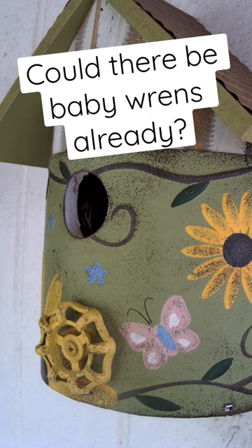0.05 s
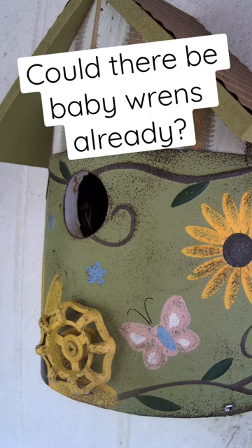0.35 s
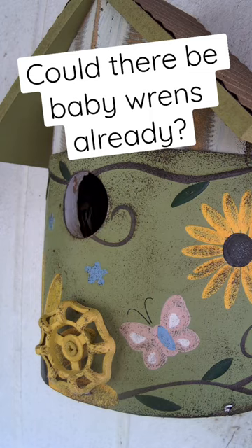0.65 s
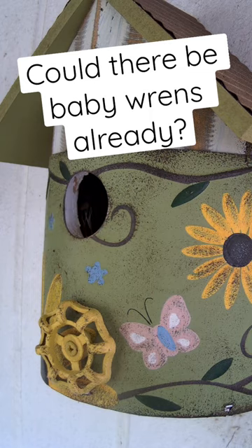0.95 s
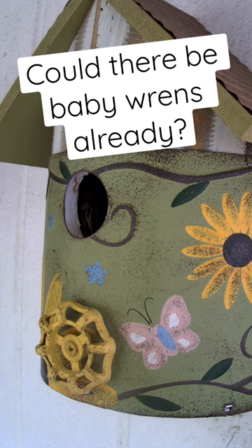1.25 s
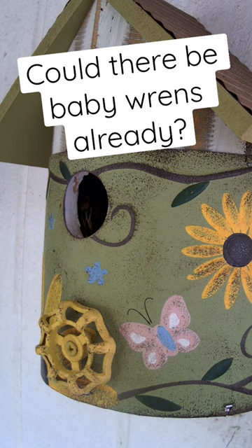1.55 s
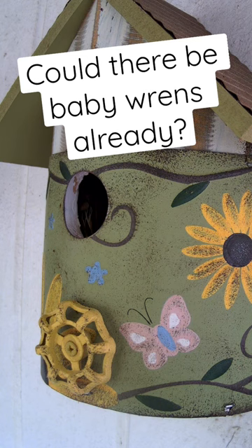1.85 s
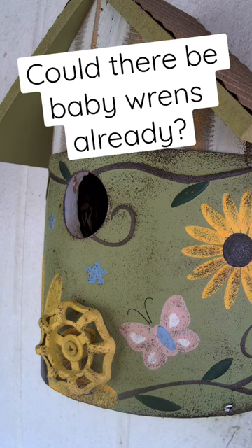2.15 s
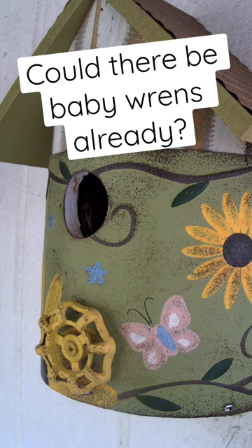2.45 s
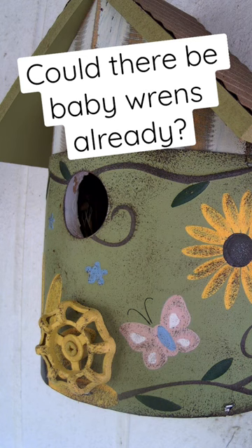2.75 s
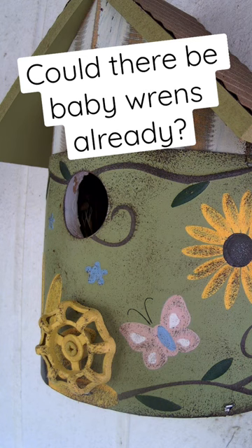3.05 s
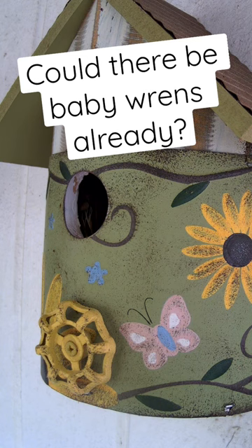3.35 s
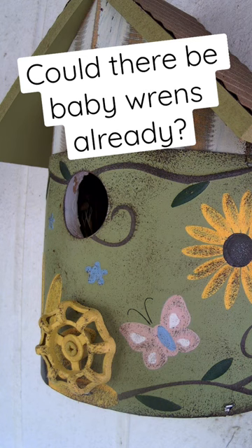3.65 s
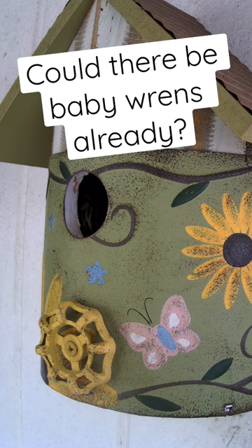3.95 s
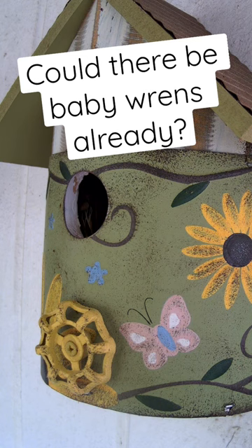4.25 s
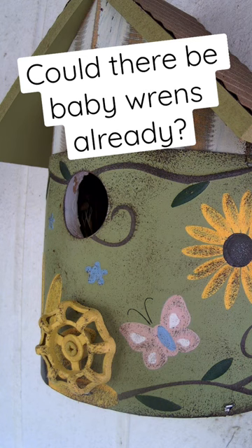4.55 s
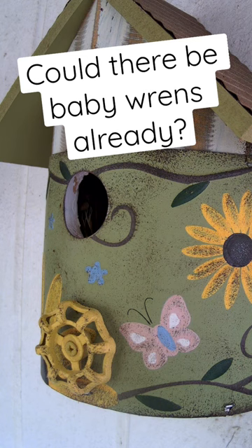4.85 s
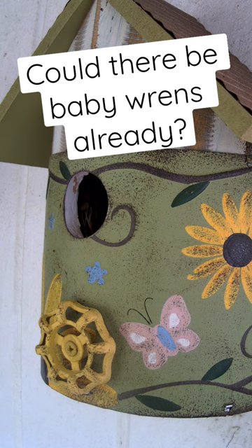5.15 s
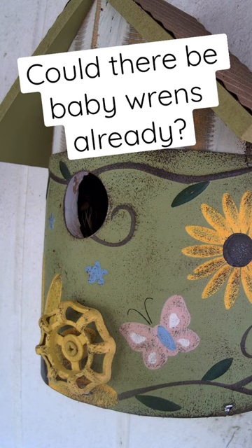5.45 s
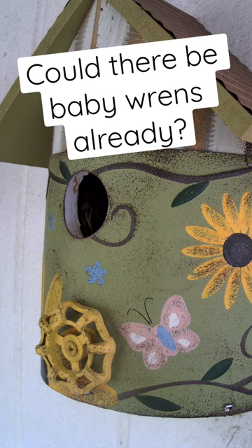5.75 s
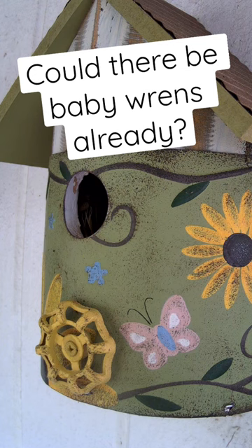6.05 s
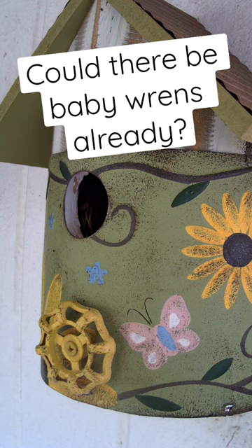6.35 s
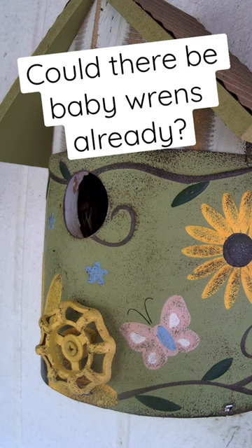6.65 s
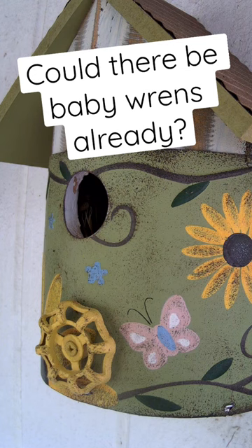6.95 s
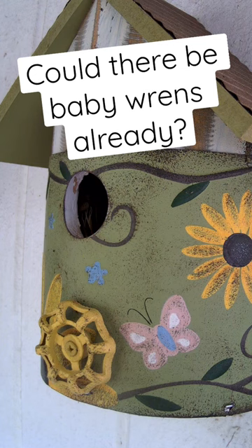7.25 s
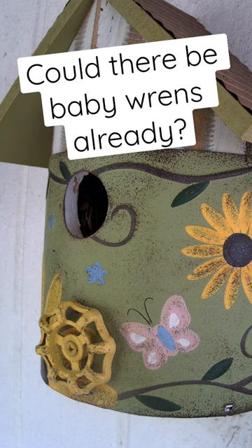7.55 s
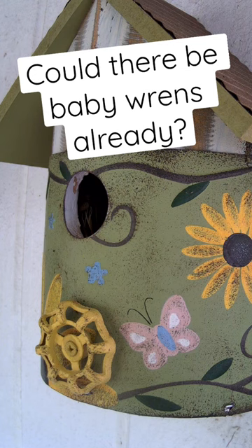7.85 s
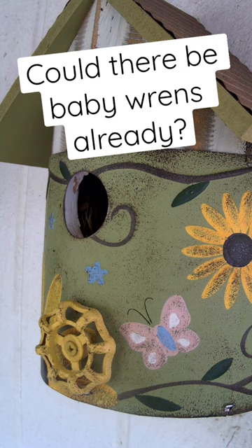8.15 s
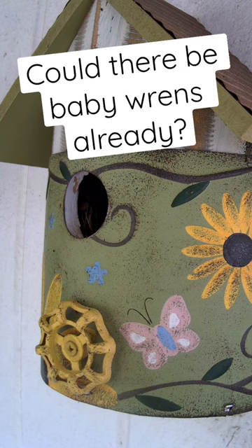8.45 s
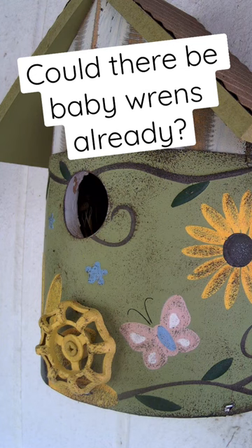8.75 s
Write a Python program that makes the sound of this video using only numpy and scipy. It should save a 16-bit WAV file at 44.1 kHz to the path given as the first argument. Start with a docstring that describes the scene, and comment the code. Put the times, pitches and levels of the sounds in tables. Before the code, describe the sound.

Baby birds squeak hoarsely as songbirds whistle far off and traffic hums; after a thump, a nearby bird sings loudly.

```python
"""From the start, distant traffic hums and wren chicks beg in rasping upslurs inside a wooden birdhouse,
while songbirds whistle across the backyard. After three and a half seconds the chicks scratch about
and fall quiet. Near four seconds a hand rubs the phone and bumps it once. The far birds sing on,
and at eight seconds one starts a loud rolling song close by, echoed by the house wall and the yard.
Under it, near the end, the chicks give two thin begging squeaks."""
import sys
import numpy as np
from scipy import signal
from scipy.fft import rfft, irfft
from scipy.io import wavfile

SR = 44100
rng = np.random.default_rng(int(sys.argv[2]) if len(sys.argv) > 2 else 0)


def int16_out(signal):
    """Quantize to a 16-bit WAV file."""
    q = np.round(np.clip(np.atleast_2d(signal).T, -1, 1) * 32767)
    wavfile.write(sys.argv[1], SR, q.astype(np.int16))


N = 392931
TIME = np.arange(N) / SR


def undb(db):
    """Turn decibels into a number to multiply by."""
    return 10 ** (np.asarray(db) / 20)


def unit(x):
    """Scale a sound to an average strength (rms) of 1."""
    return x / np.sqrt(np.mean(x ** 2) + 1e-18)


def add(out, start, x):
    """Mix x into out, beginning at start seconds."""
    i = max(int(start * SR), 0)
    out[i:i + len(x)] += x[:max(N - i, 0)]


def band(x, hz, width_hz):
    """One resonance: pitches near hz pass, the others are weakened."""
    g, k = np.tan(np.pi * hz / SR), width_hz / hz
    return signal.lfilter([g * k, 0, -g * k], [1 + g * k + g * g, 2 * (g * g - 1), 1 - g * k + g * g], x)


def ring(x, modes):
    """An object rings at several resonances, each given as (f/Hz, width/Hz, level/dB)."""
    return sum(undb(db) * band(x, hz, width) for hz, width, db in modes)


def wander(t, rate):
    """A random drift, roughly 1 up or down, that turns rate times a second."""
    points = np.random.default_rng(rng.integers(2 ** 31)).standard_normal(int(t[-1] * rate) + 2)
    return np.interp(t * rate, np.arange(len(points)), points)


def edges(t, fade_s=0.0047):
    """A soft start and end for a note."""
    return np.sin(np.pi / 2 * np.clip(np.minimum(t, t[-1] - t) / fade_s, 0, 1)) ** 2


def reverb(x, decay_s, gap_s=0.00043):
    """Countless small echoes blur together and fade by 60 dB in decay_s."""
    t = np.arange(SR // 2) / SR
    echoes = rng.standard_normal(len(t)) * np.exp(-np.log(1000) * t / decay_s) * (t > gap_s)
    return signal.fftconvolve(x, echoes / np.linalg.norm(echoes))[:N]


# the outdoor hum, from bass to treble: f/Hz, relative level/dB
HUM_SHAPE = [(25, -4.5), (40, 4.5), (66, 0), (102, -3), (180, -3.5), (215, -8), (270, -11), (335, -14),
             (550, -18.5), (760, -22), (1380, -31.5), (1550, -39.5), (2850, -38), (3600, -48.5),
             (7000, -51)]
# how the far traffic swells and sinks: t/s, relative engine level/dB, relative tyre level/dB
TRAFFIC_SWELLS = [(0.0, -2.5, -6), (0.801, -2.5, -2.5), (1.45, -4.5, -1.5), (1.9, 2.5, 3.5), (2.5, -2, 1),
                  (3.3, 4.5, -2), (4.299, 1, 5.5), (4.9, 0.5, 5), (5.9, 1.5, 5.5), (6.7, 2.0, -3),
                  (7.399, -1.5, -4), (8.9, -2.5, -4)]
# low notes of the engines: f/Hz, relative level/dB
ENGINE_TONES = [(48, -16.5), (76, -9), (146, -8.5), (178, -17.5), (257, -16.5), (437, -24), (515, -35)]


def distant_traffic(level_db=-40.5, waver_db=2.5):
    """A wavering rumble and smooth hiss, with engines and tyres that swell far away."""
    hum_hz, hum_db = np.transpose(HUM_SHAPE)
    f = np.maximum(np.fft.rfftfreq(N, 1 / SR), 1)
    shape = undb(np.interp(np.log(f), np.log(hum_hz), hum_db)) / (1 + (20 / f) ** 4)
    hum = unit(irfft(rfft(rng.standard_normal(N)) * shape, N))
    times, engine_swell, tyre_swell = np.transpose(TRAFFIC_SWELLS)
    rumble_db = waver_db * wander(TIME, 11)
    engine_db = np.interp(TIME, times, engine_swell - engine_swell.mean()) - 0.94
    tyre_db = np.interp(TIME, times, tyre_swell - tyre_swell.mean()) - 1.73
    tyre_db += waver_db / 2 * wander(TIME, 5)
    out = hum.copy()
    for swell_db, hz, width in [(rumble_db, 55, 60), (engine_db, 170, 110), (tyre_db, 400, 380)]:
        out += (undb(swell_db) - 1) * band(hum, hz, width)
    for hz, db in ENGINE_TONES:
        tone = unit(band(band(rng.standard_normal(N), hz, 14.7), hz, 14.7))
        out += tone * undb(db + engine_db + 4 * wander(TIME, 3))
    return undb(level_db) * out


def whistle(t, hz, wobble, flutter_db=6.0):
    """A nearly pure note that trembles in loudness and, by the share wobble, in pitch."""
    pitch = hz * (1 + wobble * wander(t, 150))
    return undb(flutter_db * wander(t, 200)) * np.sin(2 * np.pi * np.cumsum(pitch) / SR)


def slur(length, start_hz, middle_hz, end_hz, wobble):
    """A whistle slides through three pitches and swells until two thirds of the way through."""
    t = np.arange(0, length, 1 / SR)
    curve = np.polyfit([0, 0.5, 1], np.log([start_hz, middle_hz, end_hz]), 2)
    hz = np.exp(np.polyval(curve, t / length))
    swell = np.sin(np.pi / 2 * np.interp(t / length, [0, 0.67, 1], [0, 1, 0]))
    return swell * whistle(t, hz, wobble)


def song(phrase, times, wobble):
    """A bird sings its phrase of sliding notes at each of the given times."""
    out = np.zeros(N)
    for start, db in times:
        for after, length, start_hz, middle_hz, end_hz, note_db in phrase:
            note = slur(length, start_hz, middle_hz, end_hz, wobble)
            add(out, start + after, undb(db + note_db) * note)
    return out


# notes of three far songs: t/s into the phrase, length/s, start f/Hz, middle f/Hz, end f/Hz, level/dB
LILTING_NOTES = [(-.008, 0.046, 2070, 2390, 2690, 2), (.085, 0.035, 4700, 3280, 2850, -12),
                 (.112, 0.0376, 2440, 2750, 2980, 0), (.152, 0.059, 3560, 3400, 2960, -0.5)]
TWITTER_NOTES = [(0.00077, 0.039, 5600, 4420, 4400, -3.5)]
SLURRED_NOTES = [(0, 0.04, 2677, 2259, 2360, -4), (.042, .038, 2534, 2765, 2820, -4.5),
                 (.138, .056, 4850, 3980, 3380, -7.5), (.19, .068, 3057, 2885, 2725, -0.5)]
# when each of them is sung: t/s, level/dB
LILTING_TIMES = [(0.143, -53), (0.468, -45.5), (0.783, -46), (1.107, -46.5), (5.099, -46), (5.413, -46.5),
                 (5.726, -47.5), (6.039, -43.5)]
TWITTER_TIMES = [(5.446, -61), (5.54, -60), (5.63, -63), (5.73, -69), (5.83, -66)]
SLURRED_TIMES = [(0.666, -48), (1.114, -46), (1.559, -48.5), (6.881, -63.5), (7.322, -45), (7.762, -43)]
# single far whistles, and the bright opening of the near bird's first phrase:
# t/s, length/s, start f/Hz, middle f/Hz, end f/Hz, level/dB
SINGLE_NOTES = [(1.222, 0.033, 6900, 5630, 4900, -65), (2.375, 0.028, 3050, 2640, 2540, -50),
                (2.425, .11, 2600, 2626, 3150, -40), (2.632, .035, 3150, 2850, 2600, -46),
                (2.65, .17, 2680, 2457, 2080, -48.5), (3.03, 0.066, 2880, 3080, 3180, -51.5),
                (3.243, 0.11, 2880, 2657, 2370, -47), (3.35, .09, 2280, 2150, 2080, -59),
                (4.87, 0.14, 2650, 2583, 2570, -56), (4.938, 0.048, 3520, 3490, 2970, -53),
                (5.915, .06, 2120, 2150, 2150, -54), (6.028, 0.038, 3260, 2794, 2300, -45),
                (6.43, 0.042, 3370, 2790, 2400, -53), (6.955, 0.12, 4220, 4460, 4350, -65.5),
                (7.51, 0.08, 5800, 5910, 5860, -58.5), (7.64, 0.25, 5960, 5860, 5870, -62.5),
                (7.983, 0.017, 4320, 4400, 4210, -32.5), (8.325, 0.18, 4920, 4820, 4800, -59)]


def yard_whistles():
    """Far songs and the near bird's opening note echo in the yard; trees scatter the farthest songs."""
    farthest = song(LILTING_NOTES, LILTING_TIMES, wobble=0.026)
    farthest += song(TWITTER_NOTES, TWITTER_TIMES, wobble=0.018)
    birds = undb(-2.5) * farthest + undb(-4.5) * reverb(farthest, 0.19, gap_s=0.0037)
    birds += song(SLURRED_NOTES, SLURRED_TIMES, wobble=0.0043)
    birds += song(SINGLE_NOTES, [(0.0032, 0)], wobble=0.0054)
    return birds + undb(-10) * reverb(birds, 0.091) + undb(-9) * reverb(birds, 0.69)


# the quick pushes that make up the bump: t/s, contact time/s, level/dB
PUSHES = [(3.868, 0.0083, -16.5), (3.909, 0.0066, -15.5), (3.938, 0.0055, -18), (3.979, 0.041, -20.5),
          (4.0193, 0.00301, 1.5), (4.022, 0.00052, -12.5), (4.0389, 0.007, -4.5), (4.052, 0.0043, -8.5),
          (4.072, 0.0042, -17), (4.121, 0.0067, -14.5)]
# pitches at which the phone and hand ring: f/Hz, width/Hz, level/dB
PHONE_RESONANCES = [(58, 29, 2), (144, 40, 2.5), (236, 130, -2.5), (600, 570, 0), (1450, 1200, -13)]


def phone_bump(rub_db=-23, shake_db=-20, relax_s=0.017):
    """Pushes thump the phone, brighter when short; the hand rubs and shakes while it pushes."""
    force = np.zeros(N)
    for start, contact, db in PUSHES:
        add(force, start, undb(db) * np.sin(np.pi * np.arange(0, contact, 1 / SR) / contact))
    grip = signal.lfilter([1], [1, -np.exp(-1 / (relax_s * SR))], force)
    rub_filter = signal.butter(4, [140, 520], "band", fs=SR, output="sos")
    rub = undb(rub_db) * unit(signal.sosfilt(rub_filter, rng.standard_normal(N)))
    shake = undb(shake_db) * unit(band(band(rng.standard_normal(N), 88, 97), 90, 90))
    return ring(force, PHONE_RESONANCES) + (rub + shake) * grip / grip.max()


def scrape(length, grain_db=5):
    """A short, grainy noise that dies away."""
    t = np.arange(0, length, 1 / SR)
    grains = rng.standard_normal(len(t)) * undb(grain_db * wander(t, 610))
    return grains * edges(t, fade_s=0.00079) * np.exp(-t / length)


# scratches in the nest, and a hand rubbing the phone just before the bump:
# t/s, length/s, f/Hz, level/dB, relative treble level/dB
RUSTLES = [(3.606, 0.034, 1430, -42.5, 2), (3.833, 0.1, 1360, -49.5, -17), (3.902, 0.0069, 1090, -39, -14),
           (3.939, 0.032, 1380, -53.5, -13), (3.975, .01, 1600, -49, -23), (4.574, 0.041, 1680, -46, -17.5),
           (4.588, 0.015, 2400, -52, -22), (4.766, 0.016, 2430, -50, -18), (4.784, 0.011, 2330, -52.5, -24),
           (4.877, 0.021, 2620, -53.5, -21), (7.002, 0.0087, 2400, -57.5, -5),
           (7.185, 0.015, 2300, -59, -15), (7.212, 0.016, 2580, -48, -11), (7.233, 0.045, 2540, -57.5, -13),
           (7.263, 0.022, 2540, -54.5, -5)]
# thin high squeaks, among them two begging calls near the end: t/s, length/s, f/Hz, level/dB
THIN_SQUEAKS = [(1.003, 0.014, 6800, -63.5), (3.605, .045, 7000, -57), (3.869, 0.019, 6930, -54),
                (4.443, 0.0046, 5400, -58.5), (4.78, 0.042, 4660, -61), (5.681, 0.032, 7100, -58.5),
                (7.213, 0.1, 6870, -60.5), (8.014, .014, 6800, -60.5), (8.466, 0.043, 4650, -44.5),
                (8.471, 0.036, 6300, -49.5), (8.516, .016, 6900, -53), (8.565, .012, 6900, -56.5),
                (8.723, 0.042, 4760, -44.5), (8.729, 0.038, 6470, -49.5), (8.773, 0.023, 6950, -56)]


def rustles_and_squeaks():
    """Claws scratch in the nest, a hand rubs the phone, and now and then there is a thin squeak."""
    out = np.zeros(N)
    for start, length, hz, db, treble_db in RUSTLES:
        grains = scrape(length)
        body = ring(band(grains, hz, 830),
                    [(973, 200, 11), (1350, 350, -2.5), (1950, 420, -5), (2350, 270, -3)])
        treble = ring(band(grains, 4900, 5000), [(4240, 1000, 2.5), (6740, 400, 9)])
        add(out, start, undb(db) * unit(unit(body) + undb(treble_db) * unit(treble)))
    for start, length, hz, db in THIN_SQUEAKS:
        add(out, start, undb(db) * unit(band(band(scrape(length), hz, 1100), hz, 1100)))
    return out


# short echoes off the house wall: delay/s, level/dB
WALL_ECHOES = [(.0085, -11), (0.016, -26), (0.0236, -15.5)]


def wall_and_yard(near):
    """A close sound arrives directly, then off the wall, then as a long blur from the yard."""
    wall = np.zeros(N)
    for delay, db in WALL_ECHOES:
        add(wall, delay, undb(db) * near)
    return near + wall + undb(-12.5) * reverb(near, 0.63, gap_s=0.0077)


# notes of the rolling song: t/s into the phrase, length/s, start f/Hz, top f/Hz, end f/Hz,
# pitch rise/s, pitch fall/s, fade-in/s, fade-out/s, level/dB
ROLLING_NOTES = [(0, .042, 4110, 4273, 2758, .014, 0.024, 0.016, 0.0065, -2),
                 (0.073, .027, 1836, 2652, 2640, 0.027, 0.0075, 0.0086, 0.012, -1.5),
                 (0.107, .104, 2900, 3160, 2530, .009, .044, .005, .02, -2)]
# when it is sung: t/s, phrase length/s, level/dB
ROLLING_TIMES = [(7.986, 0.19, -17.5), (8.241, 0.21, -14.5), (8.496, .205, -14), (8.7521, 0.23, -13.5)]


def rolling_song(throat_hz=2880, throat_width_hz=705):
    """The near bird's notes rise and ease down, loudest at the pitch where its throat rings."""
    out = np.zeros(N)
    for start, phrase_s, db in ROLLING_TIMES:
        for note in ROLLING_NOTES:
            after, length, start_hz, top_hz, end_hz, rise, fall, fade_in, fade_out, note_db = note
            t = np.arange(0, min(length, phrase_s - after), 1 / SR)
            up = np.sin(np.pi / 2 * np.clip(t / rise, 0, 1))
            down = np.sin(np.pi / 2 * np.clip((t - rise) / fall, 0, 1)) ** 2
            hz = start_hz + (top_hz - start_hz) * up + (end_hz - top_hz) * down
            fades = np.minimum(t / fade_in, 1) * np.minimum((t[-1] - t) / fade_out, 1)
            tone = whistle(t, hz, wobble=0.0054, flutter_db=2.2)
            add(out, start + after, undb(db + note_db) * fades * tone)
    return band(out, throat_hz, throat_width_hz)


def soften_treble(x, cutoff_hz=4700):
    """Dulls the hiss of the chicks' rasp and squawk, scaled to strength 1."""
    return unit(signal.sosfilt(signal.butter(8, cutoff_hz, fs=SR, output="sos"), x))


# pitches at which the wooden birdhouse rings: f/Hz, width/Hz, level/dB
BOX_RESONANCES = [(910, 290, 5.5), (1353, 120, 5.5), (2080, 190, 11.5), (2520, 56, 6.5), (3440, 230, -9.5),
                  (3990, 190, -4)]


def rasp(t):
    """A chick's voice membranes flutter unevenly and ring the box; a thin hiss grows on top."""
    flutter = rng.standard_normal(len(t)) * undb(3 * wander(t, 500))
    box = soften_treble(ring(band(flutter, 3300, 10000), BOX_RESONANCES))
    hiss = unit(band(band(flutter, 6800, 660), 6800, 660))
    return box + undb(-5) * hiss * np.sqrt(t / t[-1])


def hoarseness(t, phase, spread_hz=390, clear_s=0.042):
    """A fast shiver smears the call's loudest overtone, then clears."""
    smoothing = signal.butter(2, spread_hz, fs=SR, output="sos")
    shiver = signal.sosfilt(smoothing, rng.standard_normal(len(t)))
    return soften_treble(shiver * np.sin(2 * phase)) * np.exp(-t / clear_s)


def squawk(t, peak_s=0.018, width_s=0.0057):
    """A burst of noise rings the chick's throat as the call opens."""
    breath = band(rng.standard_normal(len(t)), 2600, 1800)
    throat = ring(breath, [(1360, 140, -0.5), (2130, 170, -4.5), (2675, 400, 6), (3340, 160, 3)])
    return soften_treble(throat) * np.exp(-((t - peak_s) / width_s) ** 2)


# begging calls: t/s, length/s, top f/Hz of the loudest overtone (twice the voice's pitch),
# then level/dB of the tone, rasp, squawk, hoarseness and closing flick
BEGGING_CALLS = [(0.021, 0.066, 5260, -40, -51.5, -48.5, -62, -71),
                 (0.263, .102, 5000, -41.5, -51, -39.5, -48.5, -37),
                 (.407, 0.076, 4910, -43, -50, -40, -48, -42.5),
                 (0.507, .068, 5080, -43, -51, -42, -53, -66),
                 (0.61, .070, 4820, -42.5, -51.5, -41, -52, -44),
                 (0.716, .077, 5050, -41, -51.5, -55, -59, -46.5),
                 (1.304, 0.14, 5110, -44, -53, -40, -55, -73),
                 (1.875, .112, 5200, -42.5, -45, -34.5, -50, -47),
                 (2.024, 0.064, 4990, -39.5, -45.5, -58, -61, -69),
                 (2.128, 0.06, 5090, -49, -44.5, -62, -62, -72),
                 (2.400, .097, 4960, -42.5, -44, -34.5, -48, -40.5),
                 (2.526, .077, 5070, -38, -46, -46, -59, -70),
                 (2.643, 0.074, 5000, -36.5, -43, -49, -48, -47),
                 (3.097, .075, 4800, -38, -56, -39, -41, -64),
                 (3.541, .112, 5060, -42.5, -44, -40, -41, -52),
                 (3.703, .064, 5130, -39, -43.5, -53.5, -52, -62)]


def chicks(scoop_s=0.013, fade_in_s=0.013, wobble=0.011):
    """Each call scoops up and climbs, its tone growing as its rasp fades, then flicks downward."""
    out = np.zeros(N)
    for start, length, top_hz, tone_db, rasp_db, squawk_db, hoarse_db, flick_db in BEGGING_CALLS:
        t = np.arange(0, length, 1 / SR)
        climb = 1 - 0.23 * (1 - t / length) - 0.24 * np.exp(-t / scoop_s)
        pitch = top_hz / 2 * climb * (1 + wobble * (wander(t, 1400) + wander(t, 90)))
        phase = 2 * np.pi * np.cumsum(pitch) / SR
        tone = sum(undb(db + 4.4 * wander(t, 350)) * np.sin(harmonic * phase)
                   for harmonic, db in [(1, -10), (2, 0), (3, -22)])
        voice = tone * undb(tone_db + np.linspace(-14, -3.5, len(t)))
        voice += rasp(t) * undb(rasp_db + np.linspace(-3, -8.5, len(t)))
        voice += hoarseness(t, phase) * undb(hoarse_db)
        voice += squawk(t) * undb(squawk_db)
        add(out, start, voice * edges(t) * np.minimum(t / fade_in_s, 1))
        flick = slur(0.015, start_hz=4020, middle_hz=2615, end_hz=1800, wobble=0.043)
        add(out, start + length - 0.005, undb(flick_db) * flick)
    return out


def scene():
    """Chicks in their box, one singer near and others far off, a bump and the hum of traffic."""
    box = chicks() + rustles_and_squeaks()
    box_echo = undb(-8) * reverb(box, 0.049, gap_s=0.0015)
    yard_echo = undb(-6) * band(reverb(box, 0.19), 2500, 1500)  # mostly middle pitches come back
    close = box + box_echo + yard_echo + wall_and_yard(rolling_song())
    # close sounds ring at one narrow pitch near 2750 Hz and soften near 5650 Hz
    close = close + undb(6) * band(close, 2749, 71) - 0.21 * band(close, 5650, 870)
    return (close + yard_whistles() + phone_bump() + distant_traffic())[None]


def record(dry, ceiling=0.75, top_hz=7250):
    """The phone flattens any peak above its ceiling and steeply cuts the highest treble."""
    treble_cut = signal.ellip(8, 0.3, 70, top_hz, fs=SR, output="sos")
    return signal.sosfilt(treble_cut, np.clip(dry, -ceiling, ceiling))


dry = scene()
out = record(dry)
int16_out(out)
```